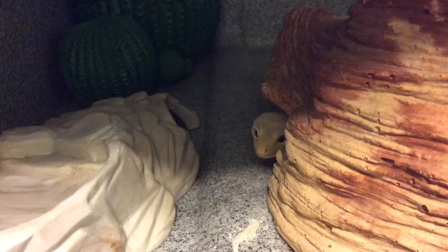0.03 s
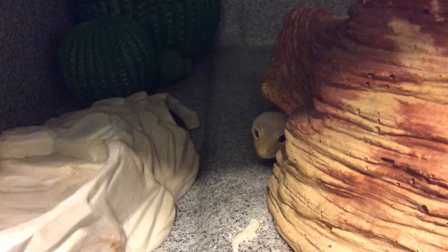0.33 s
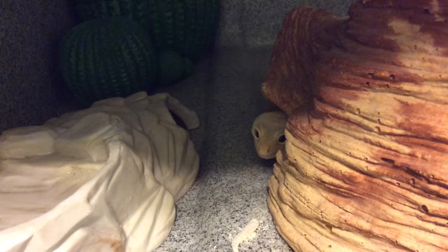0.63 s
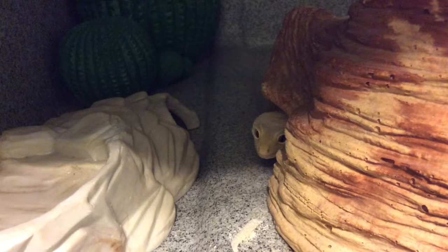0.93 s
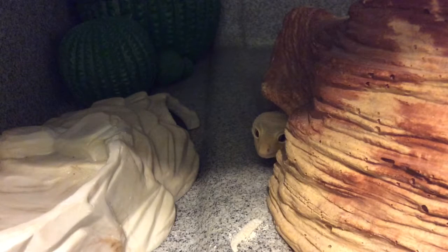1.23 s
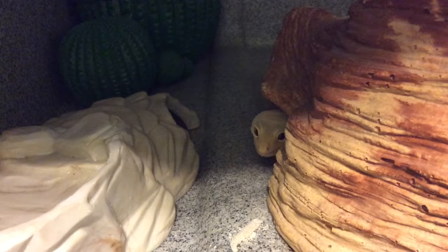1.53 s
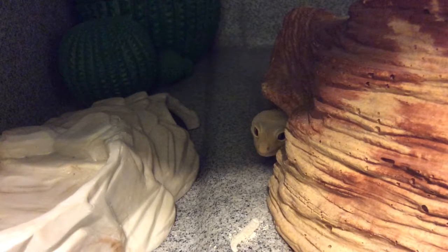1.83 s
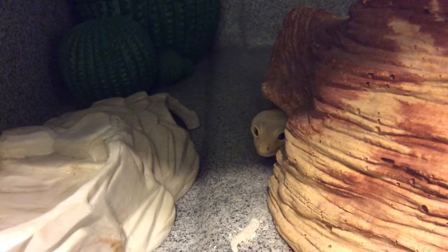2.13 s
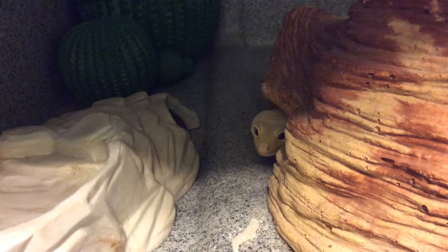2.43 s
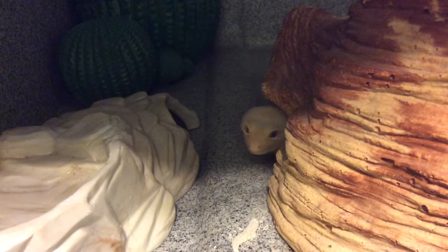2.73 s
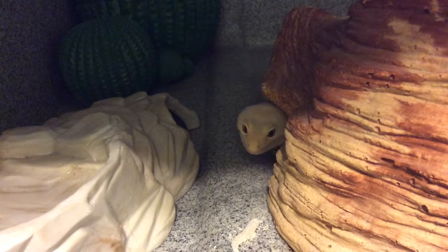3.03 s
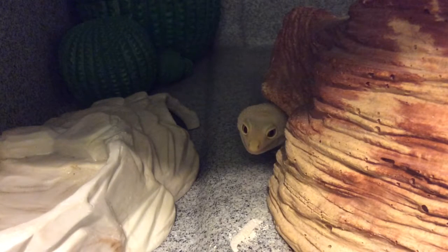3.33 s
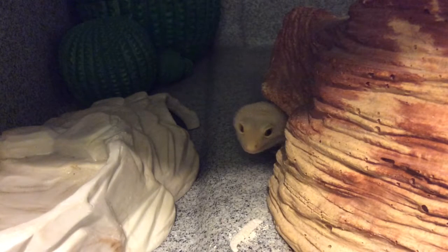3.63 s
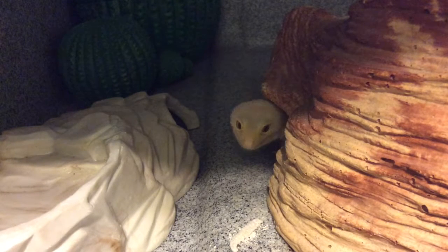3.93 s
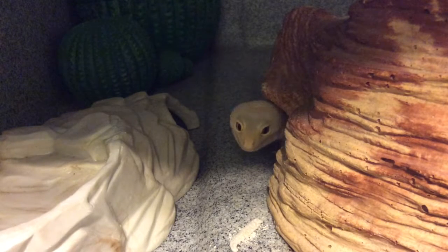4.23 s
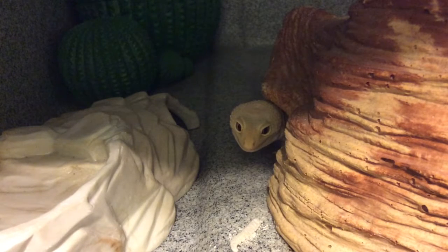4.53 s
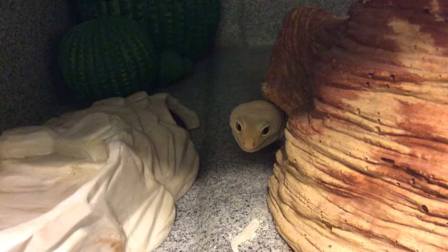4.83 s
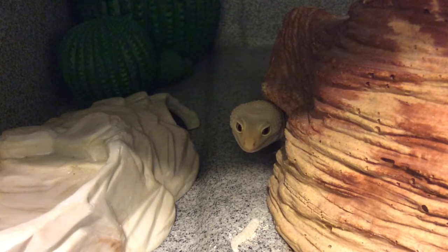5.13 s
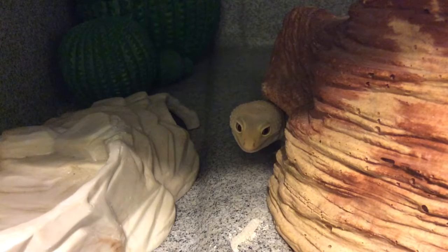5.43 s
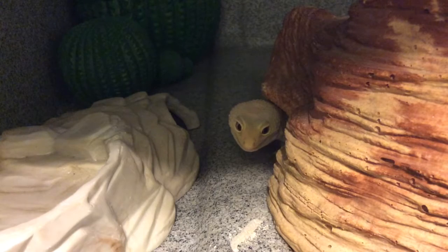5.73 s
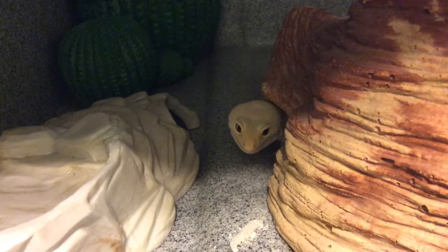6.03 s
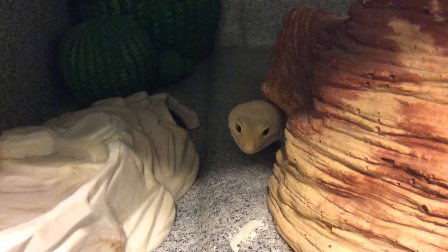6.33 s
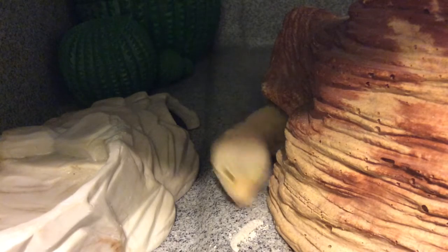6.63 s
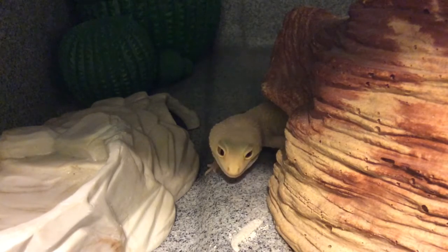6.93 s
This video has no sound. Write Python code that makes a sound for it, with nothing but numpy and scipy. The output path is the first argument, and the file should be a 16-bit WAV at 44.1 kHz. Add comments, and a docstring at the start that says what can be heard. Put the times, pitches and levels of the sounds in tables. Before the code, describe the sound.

A quiet room holds a steady low hum and rumble with the soft rush of a fan, a very faint thin heat lamp buzz and slight microphone hiss. At about 0.2 seconds a reptile makes a tiny scratch in sand. Around 0.5 seconds a dull bump, the loudest sound, briefly rings the panels of its enclosure, with a little clatter and faint squeaks. Near 3 seconds a low drone swells twice and sinks back. Faint, short shifts of sand come at about 2.8, 3.9 and 5.8 seconds. At about 6.5 seconds the reptile lunges: three quick gritty scrapes in close succession, with small clicks of grains and a light knock on the enclosure. A few softer rustles and ticks follow until about 6.9 seconds, while the hum and fan carry on unchanged.

```python
"""A steady hum and the rush of a fan fill a quiet room, over a low rumble and a heat lamp's thin buzz.
A dull bump sets the panels of a reptile enclosure ringing in their normal modes, with faint squeaks.
The reptile shifts a few grains of sand, then lunges from its hide with three quick scrapes and a light
knock. Each scrape is friction noise, heard bright through the air and dull through the floor."""
import sys
import numpy as np
from scipy import signal
from scipy.fft import rfft, irfft
from scipy.io import wavfile

SR = 44100
rng = np.random.default_rng(int(sys.argv[2]) if len(sys.argv) > 2 else 0)


def waveform_to_disk(signal):
    """Save audio, clipped to [-1, 1], as 16-bit WAV at the path in sys.argv[1]."""
    frames = np.transpose(np.atleast_2d(signal))
    scaled = np.clip(frames, -1, 1) * 32767
    samples = np.round(scaled).astype(np.int16)
    wavfile.write(sys.argv[1], SR, samples)


N = 307377
T = np.arange(N) / SR
FREQ = np.maximum(np.arange(N // 2 + 1) * SR / N, 1)


def amp(db):
    """Amplitude ratio: a factor of ten for every 20 dB."""
    return 10 ** (np.asarray(db) / 20)


def spectrum(points):
    """Spectral envelope in dB: (Hz, dB) points interpolated over log frequency."""
    hz, db = np.transpose(points)
    return np.interp(np.log(FREQ), np.log(hz), db)


def resonance(hz, width_hz):
    """Band-pass response of a steep resonator, in dB."""
    return -20 * np.log10(1 + ((FREQ / hz - hz / FREQ) * hz / width_hz / 2) ** 2)


def colour(x, db):
    """Linear filtering: each frequency is scaled by its own gain."""
    return irfft(rfft(x) * amp(db), N)


def white():
    """White noise with unit power per Hz."""
    return rng.standard_normal(N) * np.sqrt(SR / 2)


def walk(rate_hz):
    """Random modulation: low-passed noise with zero mean and unit variance."""
    slow = irfft(rfft(rng.standard_normal(N)) * np.exp(-(FREQ / rate_hz) ** 2), N)
    return (slow - slow.mean()) / slow.std()


def tone(hz):
    """A sinusoid of unit rms whose phase is the integral of its frequency."""
    cycles = np.cumsum(hz + np.zeros(N)) / SR
    return np.sqrt(2) * np.sin(2 * np.pi * (cycles + rng.random()))


def burst(start_s, rise_s, hold_s, fade_s):
    """Transient envelope: linear attack, plateau and exponential decay."""
    age = T - start_s
    attack = np.clip(age / max(rise_s, 1 / SR), 0, 1)
    return attack * np.exp(-np.maximum(age - rise_s - hold_s, 0) / fade_s)


# strokes over the sand: start_s, rise_s, hold_s, fade_s, grit_db, body_db
SAND_STROKES = [(0.18, 0.0066, .018, 0.012, -27, -17), (2.8, .008, 0.012, 0.013, -25, -21),
                (3.886, .003, 0.018, .012, -14, -12), (3.92, .004, 0.015, .012, -18, -15),
                (5.787, .015, 0.016, .02, -16, -22), (6.469, 0.026, 0.022, 0.0078, -5.5, -5.5),
                (6.525, 0.0062, 0.019, 0.022, -0.5, 0), (6.589, 0.009, 0.012, 0.017, 0, 2),
                (6.622, .02, 0.095, 0.05, -20, -15), (6.798, .005, 0.013, 0.017, -21, -23),
                (6.908, .01, 0.022, .03, -16, -11)]
# direct sound of the grit: frequency_hz, density_db
GRIT_SPECTRUM = [(1500, -125), (3500, -120), (7500, -118), (8200, -107), (9300, -108.5), (10100, -113),
                 (12300, -110), (15500, -120)]
# sound radiated by the floor: frequency_hz, density_db
FLOOR_SPECTRUM = [(100, -100), (150, -86), (240, -91), (330, -83.5), (550, -83.5), (800, -97),
                  (1000, -88.5), (1300, -90), (1600, -100), (2000, -99.5), (3000, -113), (4500, -127),
                  (9000, -140)]
def scrapes(grain_db=3.0, slip_db=0.5):
    """Sliding friction: scales drag over sand, and dense uneven grain impacts merge into noise."""
    grit, body = np.zeros(N), np.zeros(N)
    for start_s, rise_s, hold_s, fade_s, grit_db, body_db in SAND_STROKES:
        drag = burst(start_s, rise_s, hold_s, fade_s)
        grit += amp(grit_db) * drag
        body += amp(body_db) * drag
    roughness = amp(grain_db * walk(2500) + slip_db * walk(200))
    friction = white() * roughness / np.sqrt(np.mean(roughness ** 2))
    direct = colour(friction * grit, spectrum(GRIT_SPECTRUM))
    through_floor = colour(friction * body, spectrum(FLOOR_SPECTRUM))
    return direct + through_floor


# single grains and pebbles: start_s, level_db, pitch_hz, width_hz, fade_s
GRAIN_CLICKS = [(.194, -69, 8100, 900, 0.0014), (.195, -75.5, 3900, 1000, .002),
                (.2, -83, 8250, 1200, 0.021), (.212, -63.5, 1640, 280, .01),
                (2.812, -84, 11500, 2200, .002), (3.885, -84, 3800, 1400, .012),
                (3.886, -72.5, 9600, 900, 0.0015), (3.8862, -72, 13200, 3000, .003),
                (5.7115, -82, 11500, 3000, .0015), (6.494, -61, 1300, 200, 0.018),
                (6.584, -75, 11600, 3280, 0.00077), (6.59, -56.5, 1290, 200, 0.0046),
                (6.602, -60, 1290, 200, 0.0068), (6.7267, -79, 9500, 1500, 0.0013),
                (6.84, -65, 12000, 3000, 0.00092)]
def grain_clicks(echo_db=-13, echo_s=0.014):
    """Impact and reverberation: a grain clicks in one band, and wall reflections add a short tail."""
    out = np.zeros(N)
    for start_s, level_db, pitch_hz, width_hz, fade_s in GRAIN_CLICKS:
        band = colour(rng.standard_normal(N), resonance(pitch_hz, width_hz))
        snap = burst(start_s, 0.00016, 0.00017, fade_s)
        echo = amp(echo_db) * burst(start_s, 0.0035, 0, echo_s)
        out += amp(level_db) * (snap + echo) * band / band.std()
    return out


# blows on the enclosure: start_s, level_db, contact_s, frame_db (gain of the heavy frame's low modes)
BLOWS = [(0.4764, 1.5, 0.002, 6.5), (0.5028, -3, 0.00076, -21.5), (0.5114, -14.5, 0.00046, -8),
         (.537, -15, 0.00037, -10), (0.576, -15, 0.005, 14), (0.681, -19.5, 0.003, 13),
         (6.535, -11.5, 0.003, -19)]
# normal modes of the panels: pitch_hz, level_db, t60_s
PANEL_MODES = [(51, -32, 0.089), (64.7, -25.5, 0.1), (102.4, -31.5, 0.17), (169, -41, 0.31),
               (201.3, -28, 0.23), (247, -53, 0.15), (309, -47, 0.23), (331.7, -36, 0.24), (350, -67, 0.33),
               (494, -46.5, 0.3), (652, -52.5, 0.41), (808, -53, 0.27), (1010, -45.5, 0.23),
               (1117, -35, 0.09), (1217, -51, .16), (1304, -42.5, 0.17), (1494, -55, 0.19),
               (1670, -49.5, 0.16), (2466, -52.5, 0.21), (3263, -64, 0.49)]
# dull clatter after each blow: frequency_hz, density_db
CLATTER_SPECTRUM = [(30, -92), (100, -74), (150, -92), (190, -73), (330, -71), (430, -81), (900, -91.5),
                    (1300, -88.5), (1650, -104), (2800, -114), (4500, -128), (9000, -143)]
def bumps(ring_db=-4.0, clatter_db=-4, frame_below_hz=140, detune=0.0027, swing_up_s=0.0051):
    """Modal vibration: blows ring the panels; the longer the contact, the weaker the high modes."""
    panels, rattle = np.zeros(N), np.zeros(N)
    for start_s, level_db, contact_s, frame_db in BLOWS:
        first = int(start_s * SR)
        age = T[:min(SR // 2, N - first)]
        ring = np.zeros(len(age))
        for hz, mode_db, t60_s in PANEL_MODES:
            push = amp(level_db + mode_db + ring_db + frame_db * (hz < frame_below_hz))
            contact_lowpass = 1 / np.sqrt(1 + (hz * contact_s) ** 4)
            pitch_hz = hz * (1 + detune * rng.standard_normal())
            decay = amp(-60 * age / t60_s)
            ring -= push * contact_lowpass * np.sin(2 * np.pi * pitch_hz * age) * decay
        panels[first:first + len(age)] += ring * (1 - np.exp(-age / swing_up_s))
        rattle += amp(level_db) * burst(start_s, rise_s=0.022, hold_s=0.011, fade_s=0.038)
    clatter = colour(white() * rattle, spectrum(CLATTER_SPECTRUM))
    return panels + amp(clatter_db) * clatter


# slips around the bump: start_s, level_db
SLIPS = [(.437, -67.5), (.466, -59.5), (.545, -61.5)]
def squeaks(pitch_hz=808, jitter_hz=22, rough_db=1.5):
    """Stick-slip friction: something rubs as the enclosure is bumped, on one unsteady pitch."""
    slips = sum(amp(level_db) * burst(start_s, rise_s=0.015, hold_s=0.034, fade_s=0.019)
                for start_s, level_db in SLIPS)
    return tone(pitch_hz + jitter_hz * walk(90)) * slips * amp(rough_db * walk(70))


# tones of motors and mains: pitch_hz, level_db, waver_db
HUM_TONES = [(85.6, -61, 2.5), (120.1, -57, 2), (360.2, -82, 2), (365.3, -81, 2), (9000, -105, 1.5)]
def hum(drift_hz=0.21):
    """Periodic vibration: motors and mains radiate steady tones that waver slightly."""
    return sum(tone(pitch_hz + drift_hz * walk(2.8)) * amp(level_db + waver_db * walk(4))
               for pitch_hz, level_db, waver_db in HUM_TONES)


# air moved by the fan: frequency_hz, density_db
AIR_SPECTRUM = [(100, -100), (135, -87), (150, -98), (175, -87.5), (280, -89), (350, -90.5), (395, -97.5),
                (600, -97), (760, -102), (1550, -104), (2000, -116), (2500, -123), (3200, -131),
                (8000, -160)]
# resonances of the fan's housing: frequency_hz, width_hz, lift_db
HOUSING_RESONANCES = [(196, 10, 3.5), (231, 10, 2.5), (481.7, 65.5, 8.5), (614, 35, 4.5), (681, 20, 4),
                      (830, 31, 7), (904, 24, 5), (994, 16, 9.5), (1019.7, 27, 7.5), (1322, 18, 5),
                      (2310, 20, 7), (2590, 62, 0.5)]
def fan(flutter_db=0.5):
    """Source and filter: the housing's resonances shape the broadband noise of moving air."""
    housing_db = sum(lift_db / (1 + (2 * (FREQ - hz) / width_hz) ** 4)
                     for hz, width_hz, lift_db in HOUSING_RESONANCES)
    air = colour(white(), spectrum(AIR_SPECTRUM) + housing_db)
    return air * amp(flutter_db * walk(9.3))


# low rumble of the room: frequency_hz, density_db
RUMBLE_SPECTRUM = [(20, -89), (32, -90.5), (45, -83.5), (54, -78.5), (64, -71.5), (78, -75.5), (92, -71.5),
                   (108, -69), (115, -79.5), (121, -74), (126, -85), (150, -104), (600, -170)]
def rumble():
    """Stationary noise: the room's background has its power in the bass."""
    return colour(white(), spectrum(RUMBLE_SPECTRUM))


# swells of a low drone: start_s, level_db
SWELLS = [(2.81, -46.5), (3.08, -47), (3.75, -55.5)]
def drone(pitch_hz=109, wander_hz=2.41, rest_db=-66, waver_db=1.7):
    """Amplitude modulation: a low wavering tone swells quickly and sinks slowly to its resting level."""
    swells = sum(amp(level_db) * burst(start_s, rise_s=0.075, hold_s=0.028, fade_s=0.17)
                 for start_s, level_db in SWELLS)
    carrier = tone(pitch_hz + wander_hz * walk(5.8))
    return carrier * (amp(rest_db) + swells) * amp(waver_db * walk(5.8))


def fan_whirr(pitch_hz=2330, spread_hz=130, level_db=-89.5, flutter_db=2.0, period_s=2.12, width_s=0.23):
    """Random frequency modulation spreads a tone into a rough whirr, which swells in an even cycle."""
    from_crest_s = (T + period_s / 2) % period_s - period_s / 2
    swell = np.exp(-0.5 * (from_crest_s / width_s) ** 2)
    carrier = tone(pitch_hz + spread_hz * walk(150))
    return carrier * swell * amp(level_db + flutter_db * walk(140))


# ringing partials of the lamp: pitch_hz, level_db
LAMP_PARTIALS = [(8250, -89.5), (9000, -92), (9420, -89.5), (10740, -99), (12050, -101)]
def lamp(mains_hz=60, ring_s=0.0012, scatter_db=4.0, drift_s=0.00002):
    """Pulse-train excitation: the heat lamp's dimmer ticks once a mains cycle, never quite evenly."""
    age = (T + drift_s * walk(40)) % (1 / mains_hz)
    ring = sum(amp(level_db) * np.sin(2 * np.pi * hz * age) for hz, level_db in LAMP_PARTIALS)
    return ring * np.exp(-age / ring_s) * amp(scatter_db * walk(40))


def scene():
    """Superposition: the pressures of room, enclosure and reptile add in one channel."""
    room = fan() + rumble() + hum() + drone() + fan_whirr() + lamp()
    enclosure = bumps() + squeaks()
    reptile = scrapes() + grain_clicks()
    return (room + enclosure + reptile)[None]


# self-noise of the microphone: frequency_hz, density_db
HISS_SPECTRUM = [(100, -125.5), (3000, -125), (7000, -125), (9500, -127.8), (10200, -131.3),
                 (12500, -133.5), (13300, -134.5), (14000, -133), (15500, -135)]
# bright top of the microphone: frequency_hz, gain_db
MIC_RESPONSE = [(7400, 0), (7950, 1.5), (8150, 8), (9600, 8), (12600, 6), (13200, 3), (15300, 2.5)]
def record(dry, low_cut_hz=39, top_hz=15400):
    """Band-limited transduction: the microphone adds hiss, lifts the top octave and cuts both ends."""
    hiss = colour(white(), spectrum(HISS_SPECTRUM))
    low_cut_db = -10 * np.log10(1 + (low_cut_hz / FREQ) ** 6)
    heard = colour(dry[0] + hiss, spectrum(MIC_RESPONSE) + low_cut_db)
    lowpass = signal.ellip(10, 0.2, 70, top_hz, fs=SR, output="sos")
    return signal.sosfilt(lowpass, heard)[None]


dry = scene()
out = record(dry)
waveform_to_disk(out)
```